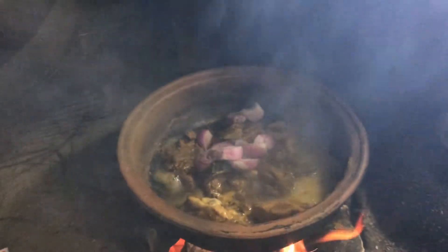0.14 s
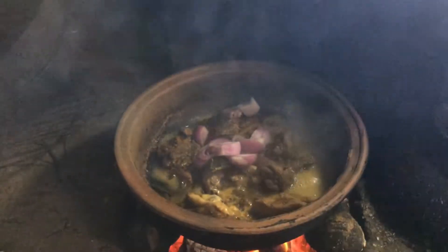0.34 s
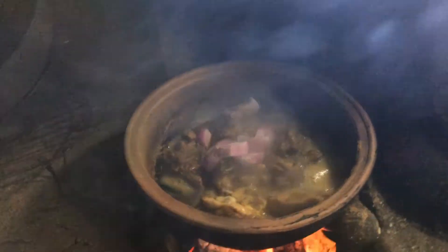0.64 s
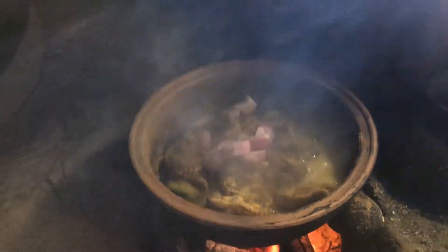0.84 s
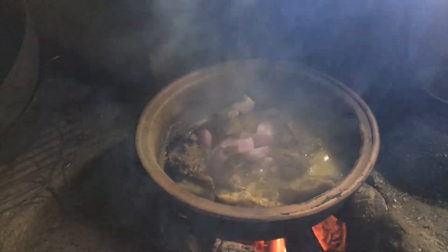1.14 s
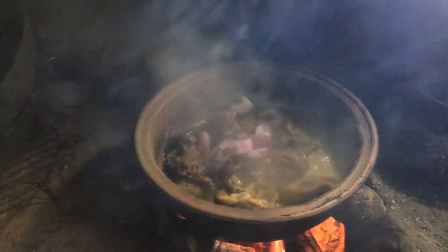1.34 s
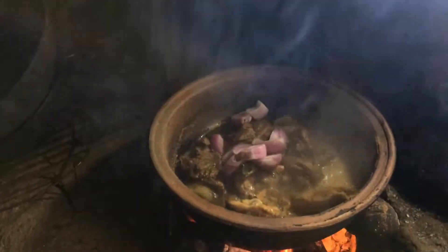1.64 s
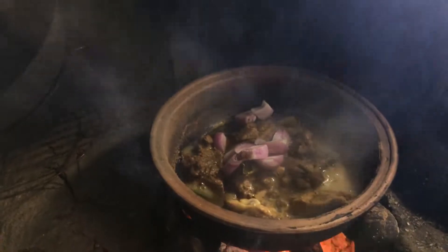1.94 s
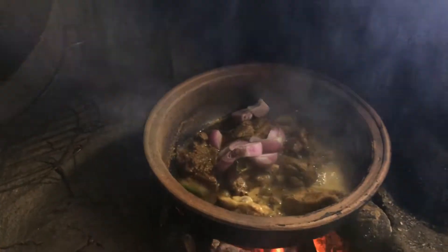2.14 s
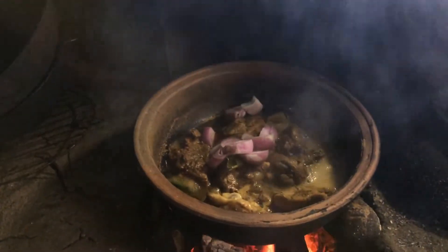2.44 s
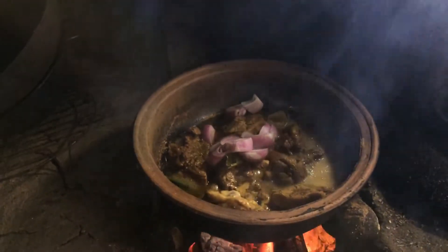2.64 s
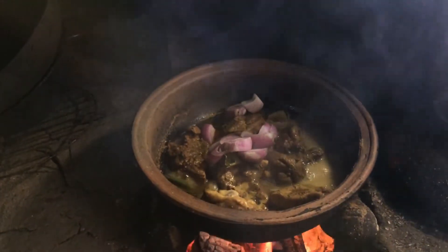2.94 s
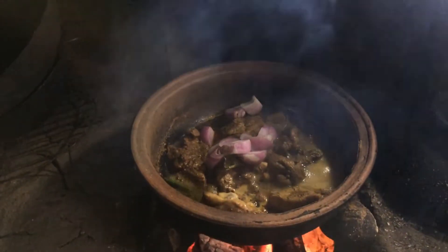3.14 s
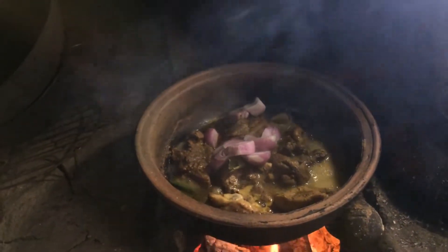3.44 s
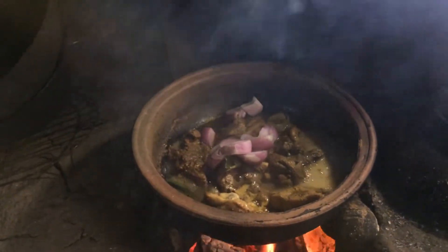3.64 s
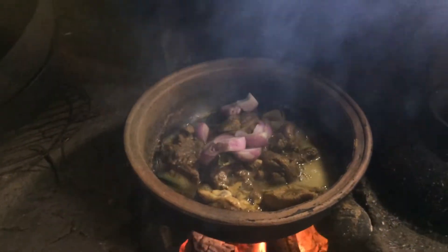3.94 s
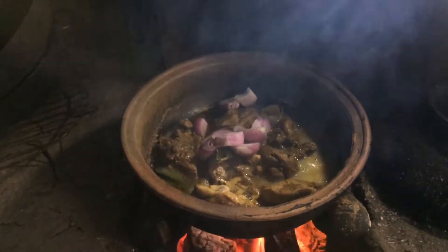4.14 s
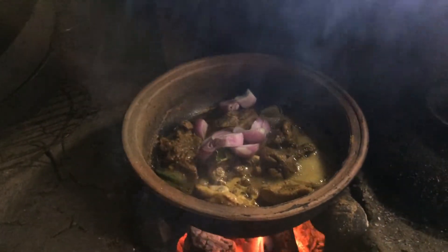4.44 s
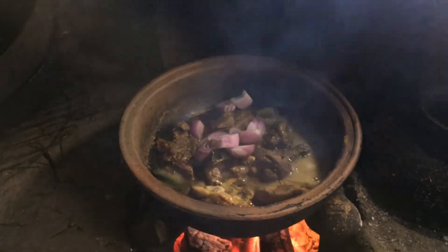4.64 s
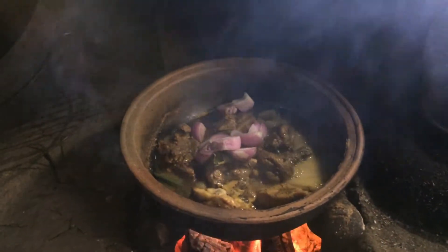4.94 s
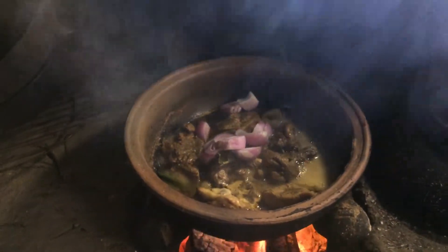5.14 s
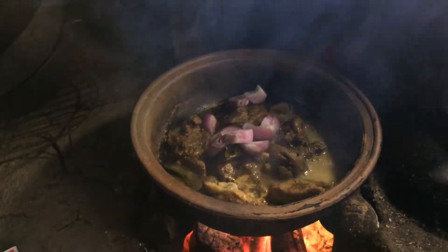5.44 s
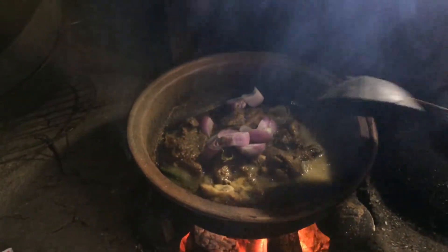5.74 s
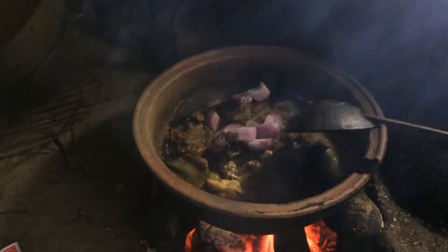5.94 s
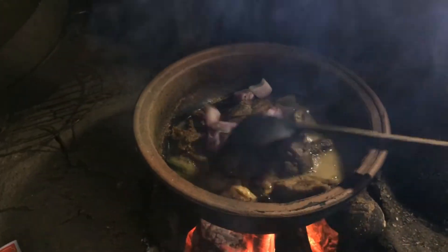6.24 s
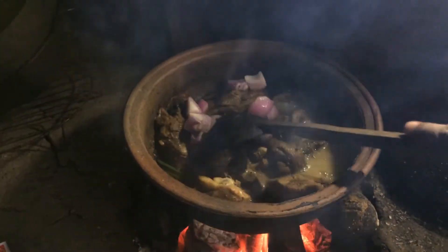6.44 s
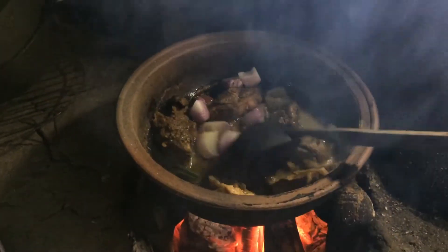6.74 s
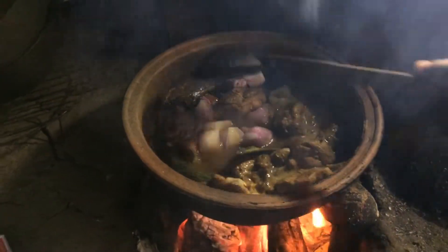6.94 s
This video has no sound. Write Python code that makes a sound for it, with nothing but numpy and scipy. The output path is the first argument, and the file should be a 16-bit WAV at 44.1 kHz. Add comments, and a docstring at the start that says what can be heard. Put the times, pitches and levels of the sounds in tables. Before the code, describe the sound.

A cow gives one long falling moo, then a stew simmers softly over a fire and a ladle knocks on the clay pot.

```python
"""A cow and a simmering stew

A cow hums, opens its mouth into one long falling moo and ends in a hoarse puff of air.
Its vocal folds buzz, and its nose, throat and mouth boost some pitches (resonances).
Close by, a stew simmers in a clay pot over a wood fire, which rumbles and ticks.
A ladle knocks on the pot and turns the wet pieces over, bursting tiny bubbles."""
import sys
import numpy as np
from scipy import signal
from scipy.fft import rfft, irfft, next_fast_len
from scipy.io import wavfile
from scipy.ndimage import map_coordinates

SR = 44100
rng = np.random.default_rng(int(sys.argv[2]) if len(sys.argv) > 2 else 0)


def int16_out(signal):
    """Quantize to a 16-bit WAV file."""
    q = np.round(np.clip(np.atleast_2d(signal).T, -1, 1) * 32767)
    wavfile.write(sys.argv[1], SR, q.astype(np.int16))


N = 313110

# The tune of the moo: time_s, pitch_hz
MOO_PITCH = [(0.27, 109.4), (0.32, 112.6), (0.372, 114.4), (0.546, 112.4), (0.726, 112), (0.896, 109),
             (1.02, 104.2), (1.24, 99.31), (1.5, 90.58), (1.632, 78.15), (1.774, 69.86), (1.8, 68.93)]
# Brief catches as the voice tires: time_s, dip_db, half_length_s
CATCHES = [(1.0, -5, 0.0079), (1.247, -4.5, .028), (1.406, -4.5, 0.009)]
# Low resonances of the nearby walls, which colour the voice: centre_hz, width_hz, gain_db
WALL_BASS = [(103, 45, -48), (185.71, 14.8, -31.5), (226.98, 9.32, -28), (251.09, 17.678, -20.5),
             (268.73, 12.5, -25.5), (303.55, 21, -34), (325.92, 8.715, -30)]
WALL_LOW_MIDS = [(426.71, 24.595, -31), (445.55, 15.775, -34), (477.74, 26.33, -24), (505.38, 10.1, -25.5),
                 (542.24, 23.554, -24.5), (682.77, 21.1, -38), (707.49, 50.66, -32)]
# Resonances of the mouth and muzzle: centre_hz, width_hz, open_gain_db, narrowed_gain_db
MOUTH = [(819.63, 29.94, -2, -30.5), (849.38, 25, -5.5, -20.5), (946.18, 49.08, -2, -6.5),
         (1016.5, 8.2, -6.5, -27.5), (1080.8, 18, -4.5, -19.5), (1136, 79.39, -1.5, -8.5),
         (1246.9, 34, -18, -17), (1337.2, 40, -15, -20.5)]
MUZZLE = [(1553, 151.4, -1.3452, -3), (1872.7, 151.5, -2, -4.5), (2083.5, 34.22, 2.0, 0.5),
          (2212, 57.68, 6.5, -3.5), (2512.1, 207.62, -5.5, -5.5), (2877.3, 158.76, -7, -32),
          (3174.5, 122.2, -20.5, -18.5), (3466.9, 201.8, -19.5, -32.5), (4020.9, 371.1, -23, -17.5),
          (4559, 78, -35, -24.5), (5778, 720, -35.5, -29)]
# Air rasping past the vocal folds: time_s, level_db
RASP_LEVEL = [(.27, -27.5), (.36, -31), (.55, -42), (.85, -42), (1.05, -36), (1.25, -39), (1.62, -28),
              (1.74, -28.5), (1.82, -32.5), (2.03, -38.5), (2.15, -55)]
# Resonances of the rasp: centre_hz, width_hz, tense_gain_db, slack_gain_db
RASP_RESONANCES = [(145, 43, -17, -2), (252.54, 49, -6, -7.5), (483.1, 252.7, 0.5, -1),
                   (691.05, 66, -4, 0.5), (866.85, 88.22, -1.5, 0.5), (1173.1, 296.7, 3.5, -7.5),
                   (1603.6, 210.35, -7.5, -1), (1827.6, 62, -6, -3.5), (2169.6, 220, -15, -11.5),
                   (2491.5, 150, -7.5, -11.5), (2896.9, 150, -8, -7.5), (3538.4, 250, -20.5, -26.5),
                   (4142, 300, -27, -29.5)]
# The last small puff of breath: time_s, level_db, half_length_s
LAST_PUFF = [(2.21, -49.5, 0.03776)]
# Gusts of hiss through the muzzle: time_s, level_db, half_length_s
GUSTS = [(.39, -51, 0.031), (1.12, -52.5, 0.09946), (1.35, -42, 0.03494), (1.47, -39, 0.032496),
         (1.66, -41.5, 0.04843), (1.84, -42, 0.018074), (1.93, -47.5, 0.07588)]
# The colour (lows against highs) of that hiss: frequency_hz, gain_db
HISS_COLOUR = [(2060, -21), (3500, 2), (3780, -3), (5160, -5.5), (5750, -4), (7510, -6.5), (9440, -11.5),
               (14800, -20.5), (16000, -17.5)]
# The tune of the hum: time_s, pitch_hz
HUM_PITCH = [(0.0, 99.56), (0.094, 106.7), (0.198, 109.6)]
# Resonances of the nose: centre_hz, width_hz, gain_db
NOSE = [(110.1, 61, -5), (224, 114.3, -12), (423.07, 69.15, 4.5), (645.57, 93, -5.5), (1490.5, 322, -14),
        (2335.3, 122.5, -5.5), (2508.1, 28, -21), (3361.5, 223.2, -21.5), (5760, 1500, -43.5)]
# Ladle blows on the pot: start_s, thud_peak_db, ring_gain_db
KNOCKS = [(5.9435, -14.5, 1.5), (5.974, -23.5, -5), (6.383, -13.5, -25), (6.396, -29, -24),
          (6.692, -27.5, -12.5), (6.707, -28, -11)]
# The colour of a blow's thud: frequency_hz, gain_db
THUD_COLOUR = [(60, -43.5), (200, -7.5), (390, 4), (500, 0), (620, -16.5), (770, -8.5), (950, -8),
               (1250, -17.5), (1850, -16.5), (2100, -31), (2600, -35), (4200, -30), (9000, -48),
               (16000, -43)]
# Ringing notes of the pot: pitch_hz, gain_db, fade_s (time to fall by 60 dB)
CLAY_NOTES = [(212.94, -14.5, 0.2705), (286.55, -2, 0.1168), (331.64, -1.5, 0.199), (440.8, 3.5, 0.0804),
              (537.05, -16.5, 0.1093), (797.8, -19.5, 0.1296), (945.67, 3.5, 0.18637),
              (1281.1, -6.5, 0.1062), (1388.8, -5, 0.1017), (1765, 6, 0.1704), (1932.1, -1, 0.0853),
              (2790, -22, 0.394), (3800, -9.5, 0.0606), (5437, -32.5, 0.1007)]
# Wet pieces sliding off the ladle: time_s, gain_db, half_length_s
SQUELCHES = [(6.337, -42.5, 0.0065), (6.357, -42.5, 0.003), (6.374, -40, 0.0046), (6.391, -49.5, 0.0027),
             (6.399, -46, 0.0052), (6.668, -42.5, 0.003), (6.691, -40, 0.002), (6.709, -39, 0.0056),
             (6.736, -49, 0.0031), (6.763, -61, .003)]
# How strong bubbles are at each pitch: pitch_hz, gain_db
BUBBLE_COLOUR = [(1500, -11), (3300, -1.5), (4200, 3), (5200, -5), (6500, 0.5), (8500, -9), (13000, -6)]
# Ticks and pops of fire and pot: start_s, peak_db, pitch_hz, sharpness, fade_s
TICKS = [(2.685, -43, 11200, 1.98, 0.0101), (3.229, -40.5, 1372, 2.072, 0.0471),
         (4.092, -37, 11000, 1.344, 0.0128), (4.146, -39, 3574, 19, 0.02973),
         (4.148, -41, 1356, 7.4, 0.1437), (4.427, -38.5, 10970, 1.011, 0.01273),
         (4.754, -33, 12400, 7.95, 0.01302), (4.756, -48.5, 3280, 2.05, 0.03313),
         (5.237, -37, 981.8, 1.965, 0.02049), (6.591, -19.5, 6000, 0.36, 0.00946),
         (7.092, -19.5, 6000, 2.413, 0.01508)]
# The slow rise and fall of the flames: time_s, gain_db
FLAME_STRENGTH = [(2.5, -50.5), (3.2, -46.5), (4.55, -49), (5.05, -54.5), (5.3, -52.5), (5.75, -46.5),
                  (6.4, -49.5), (7.1, -50)]
# The colours of flames, broth and sizzling fat: frequency_hz, gain_db
FLAME_COLOUR = [(15, -46.5), (25, -13), (38, -12), (61, -3.5), (76, 1), (88, -5.5), (102, -15.5),
                (131, -4.5), (188, -16.5), (200, -27), (260, -32.5), (340, -62), (570, -120)]
BROTH_COLOUR = [(130, -25), (220, 4), (309, 0), (377, 5.5), (590, -6.5), (907, -3), (1230, -6.5),
                (1370, -3), (2610, -14), (2860, -12), (3360, -14), (8240, -25), (10000, -19),
                (14900, -32.5), (16000, -29)]
SIZZLE_COLOUR = [(1500, 0), (4000, -4), (7000, 0), (9200, -3), (10000, 0), (10800, -1), (15000, -3.5)]
# Puffs of steam: time_s, level_db, half_length_s (its sign does not matter)
STEAM_PUFFS = [(4.38, -59.5, -0.2782), (4.7, -67, 0.0025), (5.8, -69.5, 0.1211)]
# Resonances of the steam's faint whistle: centre_hz, width_hz, gain_db
WHISTLE = [(1448.1, 81.06, 2), (2011.2, 184.9, -8), (3670.9, 537.7, -11), (4761, 503, -16),
           (6000, 358, -17)]
# Extra sizzle as stirred gravy meets hot clay: time_s, level_db, half_length_s
FLARES = [(6.46, -56, 0.03277), (6.56, -58.5, 0.1504)]
# How long the yard and the hearth echo: frequency_hz, fade_s
YARD_ECHO = [(200, 0.1568), (1500, 0.4706), (8000, 0.028)]
HEARTH_ECHO = [(200, 0.1929), (1500, 0.2055), (8000, 0.16)]

MOO_START_S, SLACKEN_S, VOICE_END_S = 0.25195, 1.5377, 1.83
TOP_HZ = 15900


def moo():
    """The vocal folds start with a push, buzz, then slacken into a rattle and plain air."""
    t = np.arange(int(2.35 * SR)) / SR
    age, slack_s = np.maximum(t - MOO_START_S, 0), np.maximum(t - SLACKEN_S, 0)
    push_db = 3 * np.exp(-age / 0.5034)
    catch_db = sum(db * np.exp(-.5 * ((t - s) / half) ** 2) for s, db, half in CATCHES)
    effort = amp(push_db + catch_db - 46.5 * slack_s) * gate(t, MOO_START_S, VOICE_END_S, 0.032964)
    rasp = amp(curve(RASP_LEVEL, t)) + swells(LAST_PUFF, t)
    # the more air against tone, the shakier the pitch
    hoarse = rasp / np.hypot(rasp, amp(-21) * effort)
    shake = 1 + (0.002 + 0.02 * hoarse) * wobble(130, t)
    pitch = curve(MOO_PITCH, t) * shake
    hz, waves, cycle = vocal_folds(pitch, t, smear=2.2, drift=.08, flutter_db=4, count=56)
    gains = walls_and_mouth(hz / shake, t)  # follows only the slow glide
    tone = effort * (gains * waves).sum(0)
    air = breath(rasp, cycle, slack_s, t)
    return (tone + air) * gate(t, MOO_START_S, np.inf, 0.011) * gate(t, 0, 2.2823, 0.06448)


def vocal_folds(pitch, t, smear, drift, flutter_db, count):
    """A buzz of overtones (multiples of the pitch); reflections scatter their timing."""
    k = np.arange(1, count + 1)[:, None]
    cycle = 2 * np.pi * np.cumsum(pitch) / SR
    scatter = smear * rng.standard_normal(k.shape)
    scatter = scatter + drift * np.sqrt(k) * np.array([wobble(21.642, t) for _ in k])
    depth_db = flutter_db * np.minimum(k / 16, 1)  # high overtones flutter most
    flutter = amp(depth_db * (np.array([wobble(19, t) for _ in k]) - .4))
    return k * pitch, np.sqrt(2) * flutter * np.cos(k * cycle + scatter), cycle


def walls_and_mouth(hz, t):
    """Overtones swell as they glide through resonances; the mouth stays wide, then narrows."""
    narrow = np.clip((t - 0.6492) / 0.9761, 0, 1)
    # a wall's reflection, 6.1 ms late, makes the upper overtones swell and fade
    wall = np.abs(1 + 0.4202 * np.clip(hz / 1800, 0, 1) ** 2 * np.exp(2j * np.pi * hz * .0061))
    mouth = amp(-22.5) * resonances(blend(MOUTH, narrow), hz)
    muzzle = amp(-39.5) * wall * resonances(blend(MUZZLE, narrow), hz)
    return resonances(WALL_BASS + WALL_LOW_MIDS, hz) + mouth + muzzle


def breath(rasp, cycle, slack_s, t):
    """Air escapes in one puff per beat of the folds and changes colour as they slacken."""
    puffs = unit(np.exp(0.4248 * np.cos(cycle) * gate(t, 0, 1.8, 0.12)))
    tense, loose = [resonant_air(blend(RASP_RESONANCES, end), t, puffs) for end in (0, 1)]
    looseness = np.clip(slack_s / 0.29051, 0, 1)
    air = rasp * (np.sqrt(1 - looseness) * tense + np.sqrt(looseness) * loose)
    hiss = unit(noise(HISS_COLOUR, t) * (1 + .5 * puffs))
    return air + (swells(GUSTS, t) + amp(-27) * rasp) * hiss


def hum():
    """With the mouth shut, the voice leaves through the nose."""
    t = np.arange(int(.3 * SR)) / SR
    pitch = curve(HUM_PITCH, t) * (1 + 0.006183 * wobble(90, t))
    hz, waves, _ = vocal_folds(pitch, t, smear=1.9, drift=.14, flutter_db=2.5, count=40)
    gains = resonances(NOSE, hz)
    tone = (gains * waves).sum(0) / np.sqrt((gains ** 2).sum(0))
    air = amp(-18) * resonant_air(NOSE, t)
    return amp(-30) * (tone + air) * gate(t, -0.02138, 0.25993, 0.0368)


def ladle_knocks():
    """Each blow is a dull thud plus the clay's ring, which the stew damps."""
    out, t = np.zeros(N), np.arange(SR // 2) / SR
    push = pulse(THUD_COLOUR)
    for start_s, peak_db, ring_db in KNOCKS:
        # the first touch, then a short chatter as the ladle settles
        chatter = rng.standard_normal(len(t)) * (fade(t, 0.0284) + amp(-21.5) * fade(t, 0.0248))
        thud = signal.fftconvolve(6 * (t == 0) + chatter, push)[:len(t)]
        ring = sum(amp(db + rng.normal(0, 0.954)) * fade(t, fade_s)
                   * np.sin(2 * np.pi * (hz * t + rng.random())) for hz, db, fade_s in CLAY_NOTES)
        ring *= amp(ring_db - 17) * (1 - np.exp(-t / 0.000477))
        add(out, start_s, amp(peak_db) * (thud / np.abs(thud).max() + ring))
    return out


def squelches(bubble_count=64):
    """Films of gravy burst in clusters of tiny bubbles that die away fast."""
    out, t = np.zeros(N), np.arange(SR // 20) / SR
    for time_s, db, half_s in SQUELCHES:
        delay, pitch, size = rng.standard_normal((3, bubble_count, 1))
        hz = np.clip(5300 * np.exp(.5 * pitch), 1000, TOP_HZ)
        age = np.maximum(t - half_s * np.clip(2 + delay, 0, 4), 0)
        gains = amp(along(BUBBLE_COLOUR, hz) + 1.4 * size)
        bubbles = (gains * fade(age, .008) * np.sin(2 * np.pi * hz * age)).sum(0)
        add(out, time_s - 2 * half_s, amp(db) * unit(bubbles) * np.sqrt(2 * half_s / t[-1]))
    return out


def ticks():
    """Fire and pot give brief cracks, each ringing around its own pitch."""
    out, t = np.zeros(N), np.arange(SR // 6) / SR
    for start_s, peak_db, hz, sharpness, fade_s in TICKS:
        burst = rng.standard_normal(len(t)) * fade(t, fade_s)
        crack = signal.lfilter(*signal.iirpeak(hz, max(sharpness, .75), SR), burst)
        add(out, start_s, amp(peak_db) * crack / np.abs(crack).max())
    return out


def flames(t):
    """The flames make a low rumble that slowly rises and falls."""
    flicker_db = 0.1335 * wobble(11, t)
    return amp(curve(FLAME_STRENGTH, t) + 1 + flicker_db) * noise(FLAME_COLOUR, t)


def broth(t):
    """The simmering broth makes a soft, almost steady murmur."""
    return amp(-57.5 + 0.2693 * wobble(12, t)) * noise(BROTH_COLOUR, t)


def steam(t):
    """Steam escapes in faintly whistling puffs."""
    return swells(STEAM_PUFFS, t) * resonant_air(WHISTLE, t)


def sizzle(t, spits_per_s=45):
    """Fat spits on the hot clay over a hiss that flares with the stirring."""
    spits = rng.choice([-1, 1], N) * (rng.random(N) < spits_per_s / SR)
    sizes = amp(5 * np.minimum(rng.exponential(size=N), 2.5))
    crackle = unit(filtered(spits * sizes, lambda hz: amp(along(SIZZLE_COLOUR, hz))))
    return amp(-66.5) * crackle + (amp(-62) + swells(FLARES, t)) * noise(SIZZLE_COLOUR, t)


def echo(x, fade_times):
    """Reflections blur into a tail in which each frequency dies at its own speed."""
    hz, t, spectrum = signal.stft(rng.standard_normal(SR // 2), SR, nperseg=256)
    tail = signal.istft(spectrum * fade(t, along(fade_times, hz)[:, None]), SR, nperseg=256)[1]
    return signal.fftconvolve(x, np.pad(tail / np.linalg.norm(tail), (SR // 200, 0)))[:N]


def amp(db):
    """Turn decibels into a gain to multiply by."""
    return 10 ** (np.asarray(db) / 20)


def unit(x):
    """Scale to an average (rms) strength of 1."""
    return x / np.sqrt(np.mean(x ** 2) + 1e-20)


def fade(t, fade_s):
    """A gain that falls by 60 dB every fade_s."""
    return amp(-60 * t / fade_s)


def gate(t, start_s, end_s, ramp_s):
    """Ramp up from start_s, hold at 1, ramp down to end_s."""
    return np.clip((t - start_s) / ramp_s, 0, 1) * np.clip((end_s - t) / ramp_s, 0, 1)


def swells(rows, t):
    """Smooth bumps of gain, one for each row."""
    return sum(amp(db) * np.exp(-.5 * ((t - s) / half) ** 2) for s, db, half in rows)


def curve(points, t):
    """Join the dots of a table over time."""
    return np.interp(t, *np.transpose(points))


def along(points, hz):
    """Join the dots of a table over frequency, on a log scale."""
    frequencies, values = np.transpose(points)
    return np.interp(np.log(hz + 1), np.log(frequencies + 1), values)


def wobble(rate, t):
    """A smooth curve through rate random points a second."""
    return map_coordinates(rng.standard_normal(int(t[-1] * rate) + 4), [t * rate])


def resonances(rows, hz):
    """The gain at hz from a set of resonant peaks."""
    return sum(amp(db) / (1 + (2 * (hz - centre) / width) ** 2) for centre, width, db in rows)


def blend(rows, amount):
    """Slide resonances from their first gain (0) to their last (1)."""
    return [(centre, width, first + amount * (last - first)) for centre, width, first, last in rows]


def filtered(x, response):
    """Turn each frequency up or down by response(hz)."""
    size = next_fast_len(len(x) + 8192)
    return irfft(rfft(x, size) * response(np.fft.rfftfreq(size, 1 / SR)), size)[:len(x)]


def noise(colour, t):
    """Noise with the given colour."""
    return unit(filtered(rng.standard_normal(len(t)), lambda hz: amp(along(colour, hz))))


def resonant_air(rows, t, flow=1):
    """Noise of flowing air, shaped by resonances."""
    return unit(filtered(flow * rng.standard_normal(len(t)), lambda hz: resonances(rows, hz)))


def pulse(colour, size=4096):
    """One click with the given colour."""
    cepstrum = irfft(np.log(amp(along(colour, np.fft.rfftfreq(size, 1 / SR)))))
    # keeping one half packs the energy at the click's start
    one_sided = np.r_[1, np.full(size // 2 - 1, 2), np.zeros(size // 2)]
    return irfft(np.exp(rfft(cepstrum * one_sided)))


def add(track, start_s, x):
    """Mix x into the track from start_s."""
    part = track[max(round(start_s * SR), 0):][:len(x)]
    part += x[:len(part)]


def scene():
    """The cow in the yard and the pot on its hearth."""
    cow, t = np.zeros(N), np.arange(N) / SR
    add(cow, 0, hum())
    add(cow, 0, moo())
    cow += amp(-18) * echo(cow, YARD_ECHO)
    pot = ladle_knocks() + squelches() + ticks()
    pot += amp(-12) * echo(pot, HEARTH_ECHO)
    return (cow + pot + flames(t) + broth(t) + steam(t) + sizzle(t))[None]


def record(dry):
    """Cut everything above TOP_HZ."""
    return filtered(dry[0], lambda hz: hz < TOP_HZ)[None]


dry = scene()
out = record(dry)
int16_out(out)
```